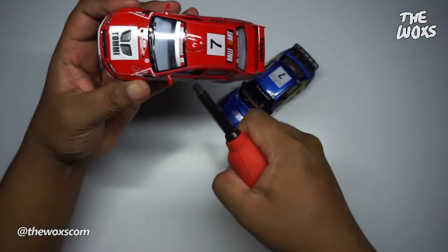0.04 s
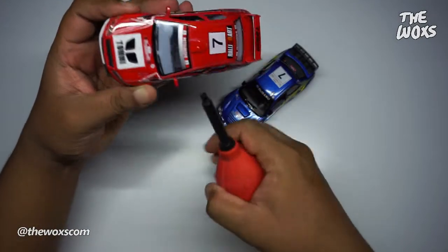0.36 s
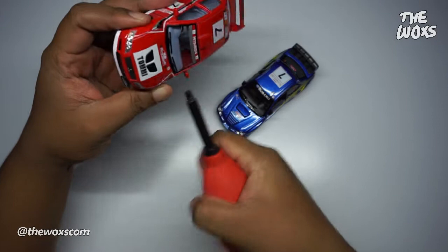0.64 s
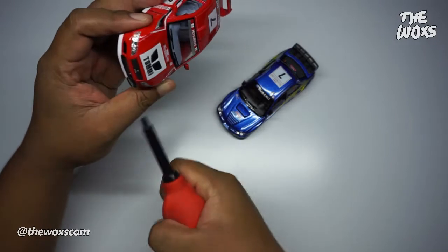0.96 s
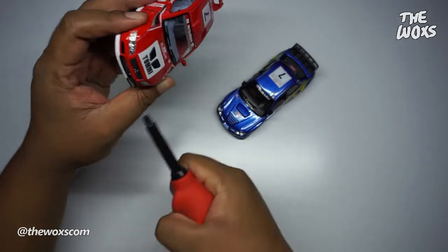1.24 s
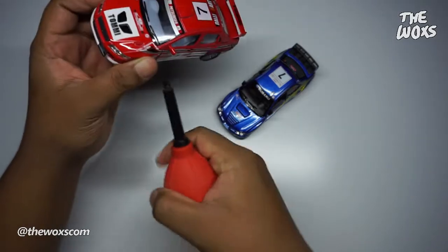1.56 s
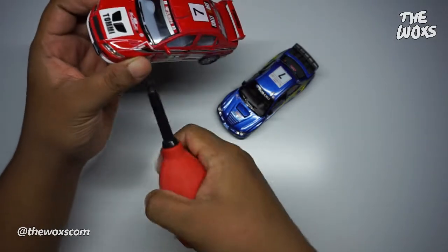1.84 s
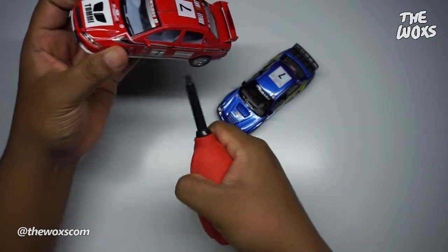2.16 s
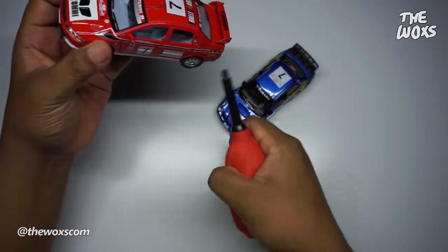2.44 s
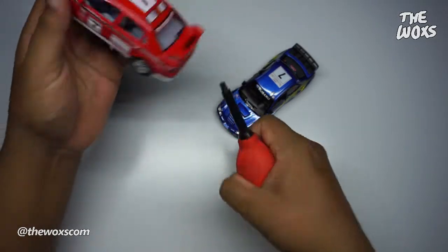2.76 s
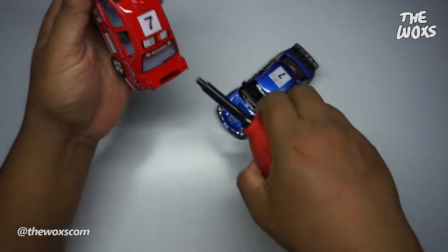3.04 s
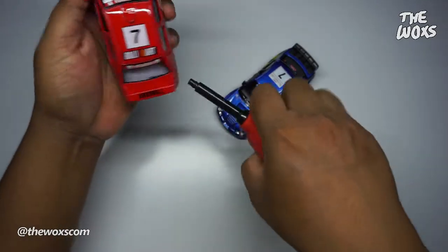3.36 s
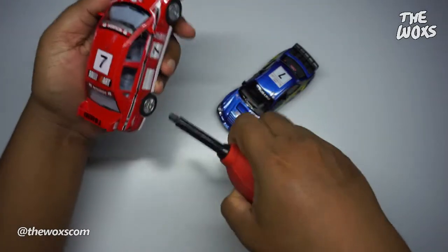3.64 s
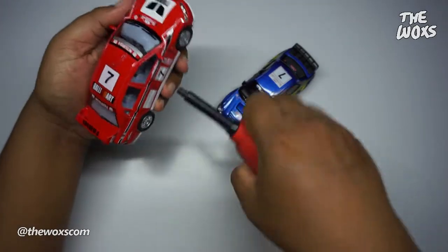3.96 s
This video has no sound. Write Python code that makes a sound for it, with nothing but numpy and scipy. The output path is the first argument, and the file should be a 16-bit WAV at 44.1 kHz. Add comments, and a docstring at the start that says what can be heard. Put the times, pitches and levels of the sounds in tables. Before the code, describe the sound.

Quick puffs from a hand-squeezed rubber air blower, thumping and whistling thinly as it refills.

```python
"""At a tabletop in a small, quiet room, a rubber bulb blower dusts a model car close to the microphone.
Each squeeze thumps the bulb and drives a hissing jet of air over the car. The bulb then refills
through its valve, which hisses and whistles thinly as the suction dies. Air seeps through the nozzle,
fingers rub and tick, and the hand jolts the table. The loudest puffs overload the recorder."""
import sys
import numpy as np
from scipy import signal
from scipy.fft import rfft, irfft
from scipy.io import wavfile

SR = 44100
rng = np.random.default_rng(int(sys.argv[2]) if len(sys.argv) > 2 else 0)


def put_to_file(sound):
    """Save the sound as 16-bit audio at rate SR, in the file named by the first command-line argument."""
    columns = np.atleast_2d(sound).T  # one column per channel
    safe = np.clip(columns, -1, 1)
    whole_steps = np.round(safe * 32767)
    wavfile.write(sys.argv[1], SR, whole_steps.astype(np.int16))


N = 176400
TIME = np.arange(N) / SR

# tone colour of leaking air, also used for the finger ticks: pitch_hz, level_db
LEAK_COLOUR = [(200, -33.5), (550, -6.5), (1300, -6.5), (2100, -4), (2800, -0.5), (3700, -6), (6500, -6),
               (8000, 0), (10000, -7), (13000, -9), (15800, -5)]


def from_db(db):
    """Turn decibels into a number to multiply a sound by."""
    return 10 ** (np.asarray(db) / 20)


def rms_one(x):
    """Scale a sound so that its average power is 1."""
    return x / np.sqrt(np.mean(x ** 2) + 1e-20)


def drift(rate_hz):
    """A smooth random wander of typical size 1; a higher rate wanders faster."""
    step, warm_up = 40, 2000  # one random value every 40 samples; the first 2000 are dropped
    memory = np.exp(-2 * np.pi * rate_hz * step / SR)
    noise = rng.standard_normal(N // step + warm_up + 2)
    slow = signal.lfilter([1], [1, -2 * memory, memory * memory], noise)[warm_up:]
    return np.interp(np.arange(N) / step, np.arange(len(slow)), rms_one(slow))


def resonate(x, hz, width_hz):
    """A resonance: it lets one pitch through and weakens those around it."""
    r = np.exp(-np.pi * width_hz / SR)
    feedback = [1, -2 * r * np.cos(2 * np.pi * hz / SR), r * r]
    return signal.lfilter(np.array([1, 0, -1]) * (1 - r * r) / 2, feedback, x)


def air(colour, flicker_db):
    """Noise with a given tone colour, whose pitch bands each swell and fade on their own."""
    log_pitch = np.log(np.fft.rfftfreq(N, 1 / SR) + 1)
    hz, db = np.transpose(colour)
    shape_db = np.interp(log_pitch, np.log(hz), db, left=db[0] - 8.5)
    spectrum = rfft(rng.standard_normal(N)) * from_db(shape_db)
    edges = np.linspace(np.log(500), np.log(14000), 22)
    band_number = np.digitize(log_pitch, edges)
    bands = (irfft(spectrum * (band_number == k), N) for k in range(len(edges) + 1))
    return rms_one(sum(band * from_db(flicker_db * drift(10.1)) for band in bands))


def breathy_tone(hz, width_hz):
    """Noise sent twice through one resonance, so that a pitch stands out."""
    once = resonate(rng.standard_normal(N), hz, width_hz)
    return rms_one(resonate(once, hz, width_hz))


def swell(start_s, rise_s, hold_s, fall_s):
    """A smooth rise from 0 to 1, a hold and a fall back to 0."""
    end_s = start_s + rise_s + hold_s + fall_s
    ramp = np.minimum((TIME - start_s) / rise_s, (end_s - TIME) / fall_s)
    return np.sin(np.pi / 2 * np.clip(ramp, 0, 1)) ** 2


def squeeze_fade(start_s, peak_s, end_s, flatness):
    """How far a puff has faded: 0 at its peak, 1 at both ends; more flatness widens the top."""
    before = (peak_s - TIME) / (peak_s - start_s)
    after = (TIME - peak_s) / (end_s - peak_s)
    return np.minimum(np.maximum(before, after), 9) ** flatness


def soft_bursts(rows):
    """A loudness curve with one soft-edged burst for each row of start_s, length_s, level_db."""
    rise_s, fall_s = 0.018, 0.036
    return sum(from_db(level_db) * swell(start_s - rise_s / 2, rise_s, length_s - rise_s, fall_s)
               for start_s, length_s, level_db in rows)


def puffs():
    """The jet hisses at the nozzle, rushes and buffets over the car and rings a hollow in it."""
    # squeezes: start_s, hiss_peak_s, rush_peak_s, end_s, hiss_flatness, rush_flatness,
    # hiss_db, rush_db, buffet_db, hollow_hz, hollow_db
    squeezes = [(-0.008, 0.071, .075, .185, 3.36, 2.57, -11, -11, -28, 1480, -21),
                (0.465, 0.554, .557, .633, 2.44, 1.16, -18.5, -15.5, -27.5, 1200, -28.5),
                (0.827, 0.913, .922, .982, 2, 1.31, -22, -14, -25, 2030, -22.5),
                (1.141, 1.216, 1.224, 1.285, 1.74, 1.22, -21, -13, -24.5, 1210, -27),
                (1.649, 1.689, 1.700, 1.785, 1.72, 1.44, -13, -22, -37, 7630, -19),
                (2.001, 2.054, 2.075, 2.142, 2.53, 3.85, -6.5, -15, -33.5, 2460, -13),
                (2.329, 2.356, 2.392, 2.436, 3.22, 2.06, -2.5, -16, -46, 6980, -15.5),
                (2.585, 2.662, 2.671, 2.704, 1.62, 1.6, -8, -19.5, -47, 10200, -13),
                (3.135, 3.231, 3.195, 3.290, 2.5, 1.8, -13, -16.5, -35.5, 1520, -64),
                (3.437, 3.481, 3.476, 3.545, 1.44, 1.1, -8.5, -7, -28.5, 1816, -11),
                (3.809, 3.877, 3.888, 3.940, 1.5, 2.15, -1, -12.5, -40, 3850, -8.5)]
    # tone colours of the nozzle's hiss, the rush over the car and the low buffeting: pitch_hz, level_db
    hiss_colour = [(900, -24), (2200, -4.5), (3200, -18.5), (3900, -7.5), (4600, -10.5), (5600, -9),
                   (7000, -4), (8200, -6), (9600, -3), (11000, -10.5), (12800, -16), (15800, -23.5)]
    rush_colour = [(400, -32.5), (750, -7), (1100, -2), (1480, 1), (1650, -1.5), (1900, 1), (2400, -0.5),
                   (2900, -1), (3400, -9), (6000, -23)]
    buffet_colour = [(50, 4), (140, -7.5), (220, -9), (330, 3.5), (580, 2), (900, -5.5), (1600, -30.5)]
    hiss = air(hiss_colour, flicker_db=1.5)
    rush = air(rush_colour, flicker_db=1.5)
    buffet = air(buffet_colour, flicker_db=1.5)
    hiss_fade_db, rush_fade_db, buffet_fade_db = 57.5, 40, 19.5  # drop from the peak to either end
    turbulence_db, table_echo_s, table_echo_db = 2, 0.0033, -20
    out = np.zeros(N)
    for (start_s, hiss_peak_s, rush_peak_s, end_s, hiss_flatness, rush_flatness,
         hiss_db, rush_db, buffet_db, hollow_hz, hollow_db) in squeezes:
        jet_fade = squeeze_fade(start_s, hiss_peak_s, end_s, hiss_flatness)
        rush_fade = squeeze_fade(start_s, rush_peak_s, end_s, rush_flatness)
        hollow = from_db(hollow_db) * breathy_tone(hollow_hz, width_hz=hollow_hz * 0.085)
        out += from_db(-hiss_fade_db * jet_fade) * (from_db(hiss_db) * hiss + hollow)
        out += from_db(rush_db - rush_fade_db * rush_fade) * rush
        out += from_db(buffet_db - buffet_fade_db * jet_fade) * buffet
    out *= from_db(turbulence_db * drift(40))
    return out + from_db(table_echo_db) * np.interp(TIME - table_echo_s, TIME, out)


def thumps():
    """The bulb buckles or springs back, ringing itself and the table with a faint rubbery crack."""
    # blows: start_s, level_db, deep_boost_db, bright_boost_db, ring_share (multiplies ring_s)
    blows = [(0.031, -35, 16, 0, 1), (0.478, -21, 13, -3, 1), (0.4866, -4, -2.5, -4, 0.75),
             (0.858, 5, -3, 1.5, 0.79), (1.11, -10, -4.5, -11, 1), (1.163, -22.5, 12, -6, 0.81),
             (1.1725, -4.5, 11, -6, 0.67), (1.424, -15.5, 0, -14, 0.96), (1.6470, 5, 0.5, 3, 0.82),
             (1.904, -37, 18, -1, 1), (2.021, -1, -4.5, -2, 0.88), (2.317, -26, 10.5, -3, 1),
             (2.613, -28, 18, -3, 1), (3.1551, -4.5, 1, 2.5, 0.79), (3.408, -24.5, 10, 1, 1),
             (3.688, -24, 1.5, 3, 1), (3.822, 3.5, 1, -1, 0.79)]
    # tones of the bulb and table: pitch_hz, level_db, ring_s (time to fade 60 dB when ringing freely)
    tones = [(89, -14.5, 0.051), (234.4, -14.5, 0.12), (331, -16, 0.077), (499.6, -14.5, 0.17),
             (570, -0.5, 0.031), (754, -16, 0.058), (924, -17, 0.028), (1200, -48.5, 0.06)]
    deep_below_hz, bright_above_hz = 400, 680
    contact_s, crack_db, crack_s = 0.00032, -19.5, 0.0068
    out = np.zeros(N)
    for start_s, level_db, deep_boost_db, bright_boost_db, ring_share in blows:
        age = np.maximum(TIME - start_s, 0)[:int((start_s + .5) * SR)]
        body = np.zeros(len(age))
        for hz, tone_db, ring_s in tones:
            boost_db = deep_boost_db * (hz < deep_below_hz) + bright_boost_db * (hz > bright_above_hz)
            fade_db = 60 * age / (ring_s * ring_share)
            body += from_db(tone_db + boost_db - fade_db) * np.sin(2 * np.pi * hz * age)
        dull_noise = rms_one(signal.lfilter([1], [1, -1.45, .52], rng.standard_normal(N)))
        crack = from_db(crack_db) * np.exp(-age / crack_s) * dull_noise[:len(age)]
        onset = 1 - np.exp(-age / contact_s)
        out[:len(age)] += from_db(level_db) * onset * (body + crack)
    return out


def refills():
    """Air is sucked in through the valve, which hisses and sings, rising and falling with the suction."""
    # breaths the bulb takes: start_s, length_s, hiss_db, shrill_db
    breaths = [(0.166, 0.17, -25, -49), (0.626, 0.16, -23, -35), (0.985, 0.16, -22.5, -27),
               (1.295, 0.15, -22, -36), (1.783, 0.16, -22.5, -32), (2.152, 0.15, -22, -30),
               (2.45, 0.14, -23, -27), (2.73, 0.17, -23, -34), (3.288, 0.15, -24.5, -37),
               (3.564, 0.16, -24, -38), (3.95, 0.14, -23, -24)]
    # tone colour of the incoming air: pitch_hz, level_db
    intake_colour = [(120, -11.5), (380, -12), (520, 2), (700, -5.5), (900, -4.5), (1300, -11),
                     (1700, -10.5), (2000, -1.5), (2800, -3), (3600, -10), (5500, -11.5), (7700, -0.5),
                     (9800, -1), (11200, -9), (12500, -20), (15800, -8)]
    # resonances of the valve and bulb: pitch_hz, width_hz, level_db
    valve = [(1560, 20, -15.5), (1940, 300, -11), (2710, 20, 2), (4390, 110, -2), (5240, 67, 5),
             (6170, 37, 8), (10500, 130, -29), (11180, 77, 9)]
    sing_hz, sing_rise_hz, wander_hz, sing_db = 13100, 600, 127, -10
    hiss = air(intake_colour, flicker_db=3.13)
    hiss = rms_one(hiss + sum(from_db(db) * resonate(hiss, hz, width) for hz, width, db in valve))
    arch = sum(np.sqrt(swell(start_s, length_s * .4, 0, length_s * .6))
               for start_s, length_s, _, _ in breaths)
    phase = 2 * np.pi * np.cumsum(sing_hz + sing_rise_hz * arch + wander_hz * drift(14)) / SR
    singing = rms_one(drift(310) * np.sin(phase) + drift(310) * np.cos(phase))  # flutter makes it airy
    intake = hiss + from_db(sing_db) * singing
    shrill = breathy_tone(15720, width_hz=130)
    rise_s, fall_s = 0.062, 0.064
    out = np.zeros(N)
    for start_s, length_s, hiss_db, shrill_db in breaths:
        suction = swell(start_s, rise_s, length_s - rise_s - fall_s, fall_s)
        out += from_db(hiss_db) * suction ** 0.52 * intake
        out += from_db(shrill_db) * swell(start_s, length_s / 2, 0, length_s / 2) * shrill
    return out


def whistles():
    """As a refill dies away, the valve locks on to a clean tone that sags with the suction."""
    # valve whistles: middle_s, rough_length_s, level_db
    notes = [(0.267, 0.1, -9), (0.735, .066, -9.5), (1.101, 0.067, -14), (1.416, 0.058, -18.5),
             (1.893, 0.087, -17), (2.261, 0.038, -17.5), (2.558, 0.051, -21), (2.845, .04, -39),
             (2.962, 0.047, -41.5), (3.402, 0.039, -20), (3.660, .07, -32)]
    middle_hz, sag_hz_per_s, waver_hz = 13770, 4600, 22
    waver = waver_hz * drift(160)
    out = np.zeros(N)
    for middle_s, length_s, level_db in notes:
        pitch_hz = middle_hz - sag_hz_per_s * (TIME - middle_s) + waver
        tone = np.sqrt(2) * np.sin(2 * np.pi * np.cumsum(pitch_hz) / SR)
        loudness = swell(middle_s - length_s * 0.47, length_s * 0.46, length_s * .1, length_s * 0.37)
        out += from_db(level_db) * loudness * tone
    return out


def leaks():
    """Slow air seeps through the nozzle between puffs; a gentle flow sounds the tube's resonances."""
    # air spitting out as the grip tightens: start_s, length_s, level_db
    spits = [(0.022, 0.063, -15), (1.642, 0.03, -32), (2.312, .035, -20.5), (2.608, 0.041, -18),
             (3.148, 0.068, -45), (3.835, .025, -22)]
    # air trickling in around a refill: start_s, length_s, level_db
    trickles = [(0.29, 0.073, -38.5), (0.37, 0.098, -41.5), (0.76, 0.048, -43), (1.13, 0.0067, -36),
                (1.43, 0.035, -34), (1.48, 0.053, -42), (1.91, 0.06, -38), (2.13, .03, -46),
                (2.42, 0.084, -41), (2.70, 0.033, -43), (2.86, 0.042, -40), (2.90, 0.057, -44),
                (3.70, 0.051, -40.5)]
    # nozzle resonances: pitch_hz, base_width_hz (narrowed below), level_db
    nozzle = [(2070, 230, 5), (2480, 190, -1), (2730, 150, 1.5), (3620, 89, -23), (4520, 100, -8.5),
              (5110, 93, -2), (6320, 130, -4.5), (7850, 140, 5.5), (8270, 200, -1), (9200, 150, -8),
              (10900, 53, -8), (10460, 120, -2), (15720, 100, -14)]
    # the faintest flows sound just one low resonance: start_s, length_s, level_db, pitch_hz
    whispers = [(0.765, .07, -39.5, 1450), (1.53, 0.065, -48.5, 2140), (2.97, 0.123, -51, 2170)]
    tube = rms_one(sum(from_db(db) * breathy_tone(hz, width * 0.8) for hz, width, db in nozzle))
    hiss = air(LEAK_COLOUR, flicker_db=3.13)
    whisper = sum(soft_bursts([(start_s, length_s, level_db)]) * breathy_tone(pitch_hz, width_hz=160)
                  for start_s, length_s, level_db, pitch_hz in whispers)
    trickle = soft_bursts(trickles) * (tube + from_db(-6.5) * hiss)
    return soft_bursts(spits) * hiss + trickle + whisper


def jolts_and_ticks():
    """The hand jolts the table into a deep thud, and fingers tick on the car."""
    # jolts and ticks: start_s, strength_db
    jolts = [(0.004, -16), (2.002, -18)]
    ticks = [(2.858, -25), (2.928, -27), (3.571, -38)]
    jolt_hz, jolt_ring_s, tick_s = 48.8, 0.16, .003
    grit = air(LEAK_COLOUR, flicker_db=0)
    out = np.zeros(N)
    for start_s, strength_db in jolts:
        age = np.maximum(TIME - start_s, 0)
        onset = np.minimum(age * jolt_hz, 1)  # builds up over one vibration
        thud = 2 * onset * np.sin(2 * np.pi * jolt_hz * age)
        out += from_db(strength_db - 60 * age / jolt_ring_s) * thud
    for start_s, strength_db in ticks:
        fade = (TIME > start_s) * np.exp(-np.abs(TIME - start_s) / tick_s)
        out += from_db(strength_db) * fade * grit
    return out


def rubs():
    """Skin sticks and slips on the rubber and the car, most of all just before the bulb gives way."""
    # finger slips: start_s, length_s, level_db
    slips = [(0.35, 0.09, -51), (0.775, 0.04, -39), (0.838, 0.021, -27), (1.155, 0.024, -45),
             (1.46, 0.19, -44), (1.62, 0.044, -41.5), (2.008, 0.0174, -24), (3.13, 0.028, -41.5),
             (3.80, .022, -33.5)]
    # tone colour of rubbing skin: pitch_hz, level_db
    rub_colour = [(120, -5), (300, 9), (550, 0), (900, -3), (1450, -15.5), (2500, -9), (5000, -25),
                  (12000, -27)]
    roughness_db = 2.5
    return soft_bursts(slips) * air(rub_colour, flicker_db=2.3) * from_db(roughness_db * drift(90))


def room_echo(x):
    """The small room answers every sound with a short, dull tail."""
    echo_db, delay_s, ring_s, dull_above_hz = -12, .004, 0.18, 2550
    age = TIME[:SR // 2]
    tail = rng.standard_normal(len(age)) * from_db(-60 * age / ring_s) * (age > delay_s)
    tail /= np.sqrt(np.sum(tail ** 2))
    tail = signal.sosfilt(signal.butter(1, dull_above_hz, fs=SR, output="sos"), tail)
    return from_db(echo_db) * signal.fftconvolve(x, tail)[:N]


def room_rumble():
    """The faint, low background noise of the room."""
    # tone colour of the quiet room: pitch_hz, level_db
    room_colour = [(20, -0.5), (40, -2.5), (55, 3), (70, -11), (90, -3), (130, -26.5), (220, -19),
                   (330, -18), (600, -28.5), (1300, -32.5), (2200, -32.5), (3500, -41), (15000, -44)]
    return from_db(-38) * air(room_colour, flicker_db=1.0)


def scene():
    """The blower in the room, the same in both channels."""
    blower = puffs() + leaks() + refills() + whistles() + thumps() + jolts_and_ticks() + rubs()
    return np.tile(blower + room_echo(blower) + room_rumble(), (2, 1))


def record(dry):
    """Overload flattens the loudest peaks, then a steep filter cuts the highest treble."""
    cutoff_hz = 15960
    treble_cut = signal.ellip(12, .1, 70, cutoff_hz, fs=SR, output="sos")
    return signal.sosfilt(treble_cut, np.clip(dry, -1, 1))


dry = scene()
out = record(dry)
put_to_file(out)
```